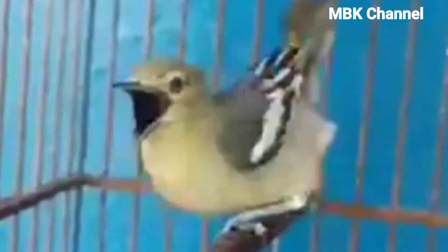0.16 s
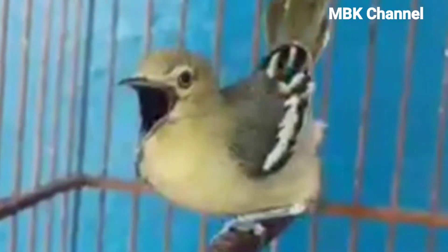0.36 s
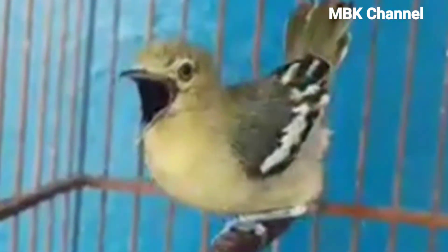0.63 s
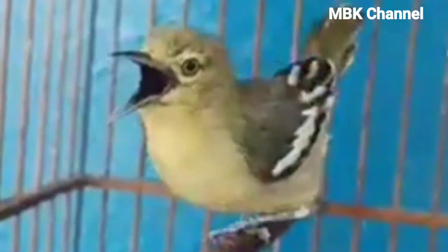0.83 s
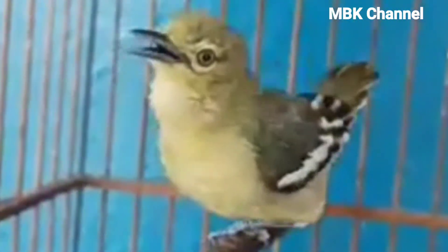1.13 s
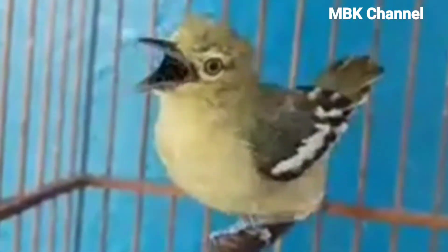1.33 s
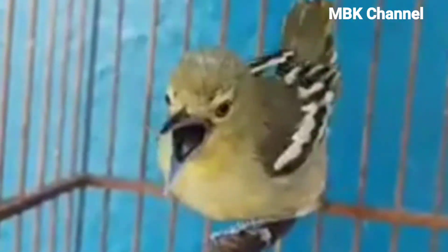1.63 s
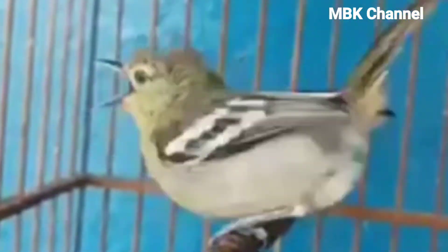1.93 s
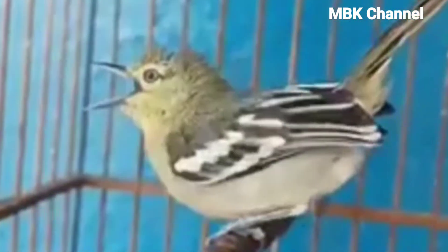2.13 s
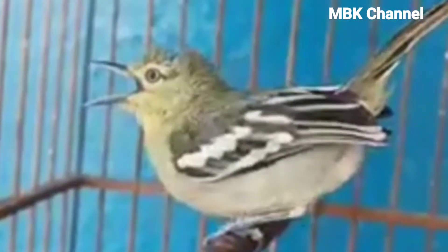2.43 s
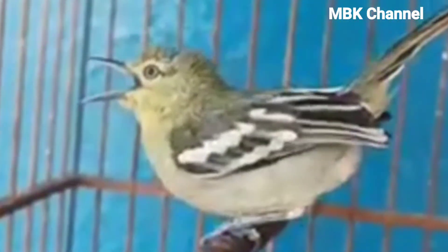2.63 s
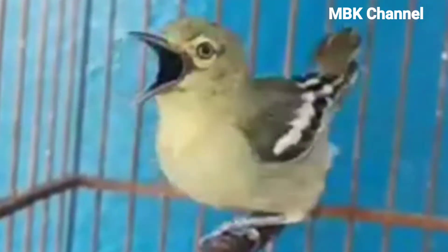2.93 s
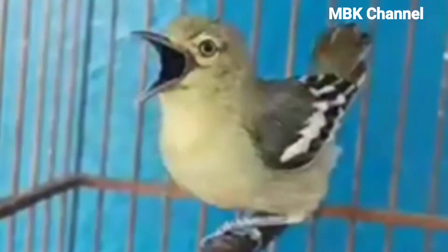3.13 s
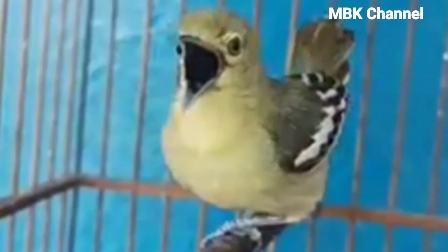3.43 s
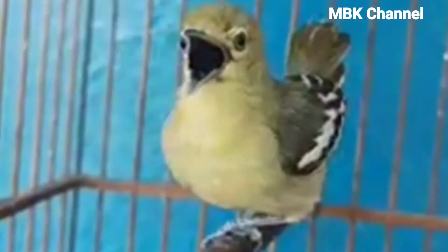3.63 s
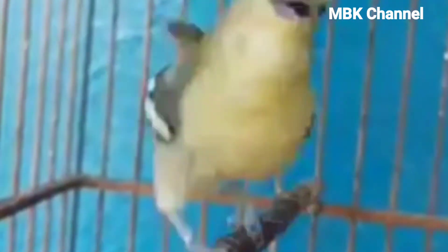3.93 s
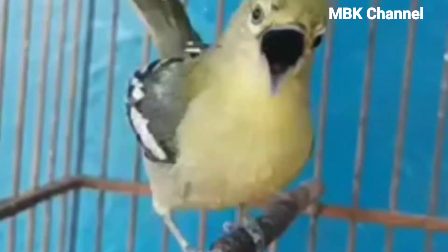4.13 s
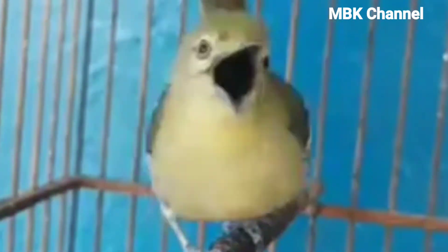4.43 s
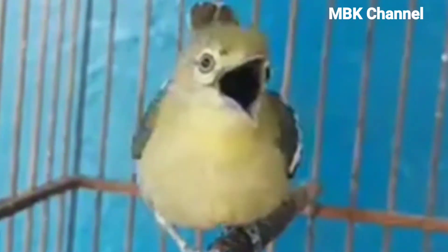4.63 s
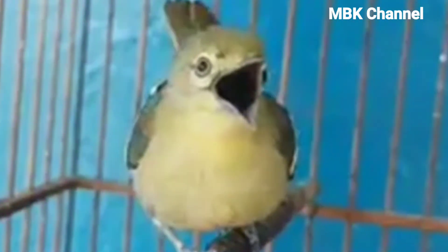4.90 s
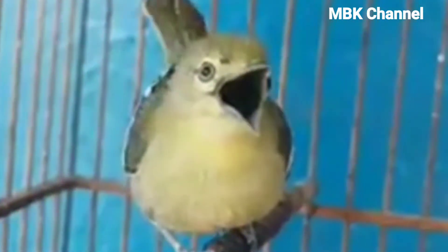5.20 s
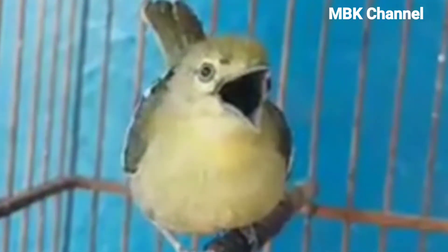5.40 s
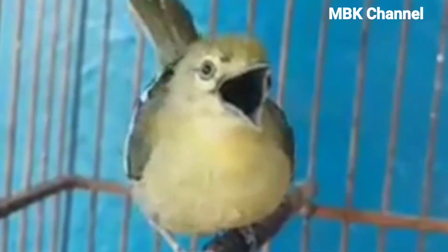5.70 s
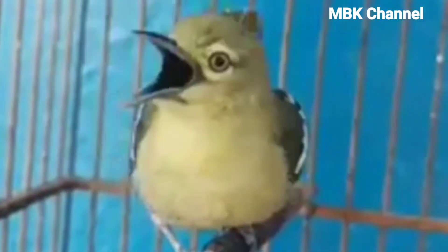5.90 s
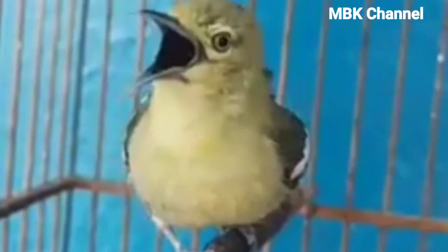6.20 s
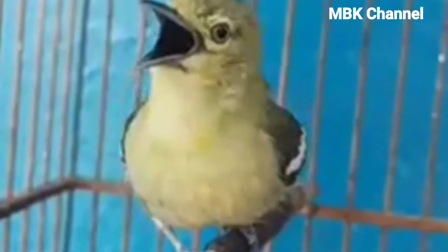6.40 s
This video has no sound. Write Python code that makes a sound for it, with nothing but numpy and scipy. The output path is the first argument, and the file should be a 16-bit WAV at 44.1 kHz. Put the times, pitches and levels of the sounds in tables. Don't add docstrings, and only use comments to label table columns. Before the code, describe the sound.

Brief scratchy scuffs on a perch, then a harsh throbbing bird rasp very near the microphone, followed by a short whistle sliding down. In the gap, thin far birdsong echoes from walls above traffic rumble and faint engine hum. The rasp and fall repeat. After a quieter stretch of distant chips, rapid pips swell into a clear held whistle that lasts to the end. Background dips under loud calls.

```python
import sys
import numpy as np
from scipy import signal
from scipy.fft import rfft, irfft, next_fast_len
from scipy.io import wavfile
from scipy.ndimage import uniform_filter1d

SR = 44100
rng = np.random.default_rng(int(sys.argv[2]) if len(sys.argv) > 2 else 0)


def store_wav(level_fs):
    pcm = np.round(np.clip(np.atleast_2d(level_fs), -1, 1) * 32767)
    wavfile.write(sys.argv[1], SR, pcm.T.astype(np.int16))


def elevation(decibels):
    levels = np.asarray(decibels, float)
    return 10 ** (levels / 20)


N = 288855


def evened(x):
    return x / np.sqrt(np.mean(x ** 2) + 1e-20)


def wander(n, size):
    noise = rng.standard_normal(SR * 2)
    return evened(uniform_filter1d(uniform_filter1d(noise, size), size))[:n]


def read(points, hz):
    f, value = np.transpose(points)
    return np.interp(np.log(hz + 1), np.log(f + 1), value)


def stretched(shape, start, length):
    share, *columns = np.transpose(shape)
    return [start + length * share] + columns


def unroll(rows):
    s, *columns = np.transpose(rows)
    t = np.arange(s[0], s[-1], 1 / SR)
    return s[0], [np.interp(t, s, c) for c in columns]


def add(mix, s, sound):
    part = mix[round(s * SR):][:len(sound)]
    part += sound[:len(part)]


def soft_ends(n, seconds):
    k = np.arange(n)
    return np.sin(np.pi / 2 * np.clip(np.minimum(k, n - k) / (seconds * SR), 0, 1)) ** 2


def resonate(x, hz, width):
    turn = np.exp(2j * np.pi * np.cumsum(hz * np.ones(len(x))) / SR)
    r = np.exp(-np.pi * width / SR)
    return 2 * (turn * signal.lfilter([1 - r], [1, -r], x / turn + 1e-18)).real


def resonate_twice(x, hz, width, hz_2, width_2):
    return resonate(resonate(x, hz, width), hz_2, width_2)


def shaped(x, gain):
    n = next_fast_len(N + 4096)
    return irfft(rfft(x, n) * gain(np.fft.rfftfreq(n, 1 / SR)), n)[..., :N]


def ports(x, lead_ms, left_db):
    left = shaped(x, lambda hz: elevation(left_db / 2) * np.exp(2j * np.pi * hz * lead_ms / 1000))
    return np.array([left, x * elevation(-left_db / 2)])


# (f/Hz, time to fall 60 dB/s)
YARD_RING = [(300, 0.29), (1500, 0.23), (4000, 0.29), (8000, 0.31)]


def yard(x, predelay_s):
    taps = np.zeros((2, SR))
    at = np.arange(round(predelay_s * SR), SR - 40, 20)
    at = at + rng.integers(0, 20, (2, SR // 20))[:, :len(at)]
    signs = rng.choice([-1., 1.], (2, SR // 20))[:, :at.shape[1]]
    np.put_along_axis(taps, at, signs, 1)
    hz, t, z = signal.stft(taps, SR, nperseg=256)
    decay_db = -60 * t / read(YARD_RING, hz)[:, None]
    tail = signal.istft(z * elevation(decay_db), SR, nperseg=256)[1]
    return signal.fftconvolve(x[None], tail / np.linalg.norm(tail[0]), axes=1)[:, :N]


# (f/Hz, level per Hz/dB)
YARD_AIR = [(15, -72), (30, -31.5), (76, -17), (123, -2.5), (209, -17.5), (282, -22), (324, -18),
            (408, -21.5), (796, -28.5), (1030, -27.5), (1350, -30), (1960, -30.5), (2830, -31),
            (3250, -35.5), (6200, -48.5), (8060, -48.5), (13600, -120)]
# (t/s, level/dB)
TRAFFIC_SWELL = [(0, -48), (1.199, -51), (1.499, -46.5), (2.9, -47.5), (3.9, -47), (4.149, -48), (5.1, -46),
                 (5.9, -45), (6.55, -40)]
# (f/Hz, likeness 0-1)
LIKENESS = [(60, 0.97), (150, 1), (370, 0.81), (930, 0.3), (2310, 0.017), (5750, 0.072)]


def traffic():
    frames, hz = N // 512 + 5, np.fft.rfftfreq(2048, 1 / SR)
    a, b, c, d, patches = rng.standard_normal((frames, 1025, 5)).T
    patches = evened(uniform_filter1d(uniform_filter1d(patches, 8, 0), 8, 1))
    same = np.clip(read(LIKENESS, hz), -1, 1)[:, None]
    left = a + 1j * b
    right = same * left + np.sqrt(1 - same ** 2) * (c + 1j * d)
    z = np.array([left, right]) * elevation(read(YARD_AIR, hz)[:, None] + 2.54 * patches)
    rumble = evened(signal.istft(z, nperseg=2048, noverlap=1536)[1][:, :N])
    swell_db = np.interp(np.arange(N) / SR, *np.transpose(TRAFFIC_SWELL))
    return elevation(swell_db + [[2.5], [1.5]]) * rumble


# (t/s, length/s, level/dB, brightness/dB)
HOPS = [
    (.008, 0.03, -54.5, -25),
    (0.104, 0.011, -50, -3),
    (0.12, 0.0044, -79, -19.5),
    (2.028, 0.017, -57, -3.5),
    (4.507, 0.056, -72.5, 6),
]


def hops():
    out = np.zeros(N)
    for s, length, db, bright_db in HOPS:
        grit = rng.standard_normal(4000) * elevation(0.45 * rng.exponential(1, 4000))
        grit = grit[:round(length * SR)]
        dull, bright = evened(resonate(grit, 1600, 3930)), evened(np.diff(grit, prepend=0))
        add(out, s, elevation(db) * (dull + elevation(bright_db) * bright) * soft_ends(len(grit), 0.0014))
    return ports(out, 0.09, 21.5) + elevation(5.0) * yard(out, 0.0053)


# (t/s, length/s, effort level/dB, throat pitch f/Hz)
RASPS = [
    (0.166, 0.9136, -24.5, 4503),
    (2.918, 0.92, -25, 4442),
]
# (share of length, effort level/dB, share of throat pitch, beak brightness/dB, low rattle/dB)
RASP_SHAPE = [(0, -14, 1.03, 9.5, 12.5), (.025, -3.5, 0.89, 17, 9), (.25, -1, 0.96, 6, 4.5),
              (.5, 1.9, 0.9, 4.5, 0), (.72, 4.5, 0.88, -12, -2), (.86, 5, 0.84, -5.5, -5.5),
              (.95, 5, 0.7, 0, -6), (.985, -6.5, 0.49, -18, 1.5), (1, -18, 0.32, -34.5, -1.5)]
# (share of throat pitch, width f/Hz, level/dB)
THROAT = [(.25, 350, -19), (.34, 512, -15), (.56, 435, -5), (.7, 415, -4), (.84, 447, 5), (1.01, 373, 10.5),
          (1.22, 517, -11), (1.6, 1020, -28)]
# (f/Hz, width
# f/Hz, depth 0-1, change of depth by the end)
RASP_DIPS = [(1830, 220, .5, .5), (5850, 200, .85, 0), (5900, 250, .7, 0), (3720, 300, 1.1, -.8),
             (3740, 300, 1, -.9), (2740, 220, .5, 0)]


def rasp(start, length, level_db, top_hz):
    curves = np.transpose(stretched(RASP_SHAPE, start, length))
    s, (effort_db, closing, bright_db, low_db) = unroll(curves)
    n, hz = len(closing), top_hz * closing
    depth = np.linspace(0.45, 0.72, n)
    throbs_per_s = 65 * (1 + 0.086 * wander(n, size=300))
    beat = (.5 + .5 * np.cos(2 * np.pi * np.cumsum(throbs_per_s) / SR)) ** 2.5
    white, chance = rng.standard_normal(SR * 2)[:n], rng.random(SR * 2)[:n]
    size = rng.exponential(1, SR * 2)[:n]
    snaps = (chance < 900 / SR) * elevation(0.4 * np.minimum(size, 3))
    drive = evened(snaps - snaps.mean()) + 1.12 * white
    throat = np.zeros(n)
    for k, (share, width, db) in enumerate(THROAT):
        low, high = share < .6, share > 1.1
        deep = np.clip(depth + .3 * low, .25, .92)
        throbbing = drive * (1 - deep + deep * beat ** (1 + low))
        ring = resonate_twice(throbbing, share * hz, width * 1.82, share * hz, width * 1.7)
        ring_db = db + bright_db * high + low_db * low
        throat += (-1) ** k * elevation(ring_db) * ring
    for dip_hz, width, most, change in RASP_DIPS:
        dip_depth = np.clip(most + change * np.arange(n) / n + .2 * wander(n, size=5000), 0, 1)
        moving_hz = dip_hz * (1 + .008 * wander(n, size=6000))
        throat = throat - dip_depth * resonate(throat, moving_hz, width)
    return s, elevation(level_db + effort_db) * evened(throat) * soft_ends(n, 0.0068)


def whistle(rows, tones=(), waver=0.006, fade=0.0022, flutter_db=0., blur=0.):
    s, (hz, db, octave_db) = unroll(rows)
    n = len(hz)
    turn = 2 * np.pi * np.cumsum(hz * (1 + waver * wander(n, size=150))) / SR
    upper = 0
    for k, g in enumerate(tones):
        strength = .9 / (k + 1) ** 1.5 + .45 * wander(n, size=300)
        upper = upper + elevation(g) * strength * np.sin((k + 3) * turn + .3 * k * wander(n, size=80))
    tone = elevation(db + flutter_db * wander(n, size=200)) * np.sin(turn)
    octave_blur = blur * np.linspace(0, 1, n) * wander(n, size=50)
    tone = tone + elevation(octave_db) * np.sin(2 * turn + octave_blur)
    tone = tone + elevation(np.linspace(-4, -20, n)) * upper * soft_ends(n, 0.028)
    return s, np.sqrt(2) * tone * soft_ends(n, fade)


FALL_TONES = [-44.5, -35.5, -34, -53, -41, -51]
# (share of length, level/dB)
WHEEZE = [(0, -3.5), (.5, -15), (.68, -0.5), (.95, -4), (1, -11)]


def falling_whistle(shape, start, length, level_db):
    out = np.zeros(N)
    s, share, db, octave_db = stretched(shape, start, length)
    rows = np.transpose([s, 2230 * share, level_db + db, octave_db])
    add(out, *whistle(rows, FALL_TONES, waver=.002, fade=.003, blur=1.6))
    catch = evened(resonate_twice(rng.standard_normal(400), 2180, 1100, 2230, 690))
    add(out, start - .002, elevation(-33.5) * catch * soft_ends(400, 0.0034))
    s, (leak_db,) = unroll(np.transpose(stretched(WHEEZE, start, length)))
    air = rng.standard_normal(SR)[:len(leak_db)]
    air = evened(resonate_twice(air, 2490, 1600, 2490, 1600)) + elevation(-6.5) * air
    add(out, s, elevation(-44.5 + leak_db) * air * soft_ends(len(air), .003))
    return out


# (start t/s, end t/s, f/Hz, level/dB)
DRONES = [
    (4.1, 4.48, 261, -57),
    (4.62, 5.25, 210, -56),
    (5.92, 6.6, 215, -54),
    (1.4, 2.75, 1060, -63),
    (4.15, 6.6, 121, -51),
    (4.5, 6.3, 312, -62),
    (5.0, 5.6, 525, -64),
    (4.7, 5.6, 172, -58),
    (1.4, 3.0, 118, -54),
]


def drones():
    out = np.zeros(N)
    for t0, t1, hz, db in DRONES:
        noise = rng.standard_normal(SR * 2)[:round((t1 - t0) * SR)]
        hum = evened(resonate_twice(noise, hz, hz ** 2 / 12000, hz, hz / 10))
        add(out, t0, elevation(db) * hum * soft_ends(len(hum), 0.0059))
    return out


# (share of length, share of top pitch, level/dB)
CLIMB = [(0, .5, -6), (.42, .59, 0), (.68, .77, 2), (.84, .88, -5), (1, 1, -10)]
HOOK = [(0, .82, -3), (.19, 1, -2), (.26, .98, -3), (.48, .81, 1), (.55, .77, -11), (.75, .69, -8),
        (1, .76, -12)]
ARCH = [(0, .7, -3), (.3, .95, -1), (.48, 1, 0), (.63, .95, -3), (.78, .77, 0), (1, .63, -2)]
SPIKE = [(0, .63, -2), (.34, .73, 1), (.47, 1, -4), (.62, .8, -3), (.76, .71, 1), (1, .62, -4)]
CHIP = [(0, .6, -9), (.2, .93, -1), (.3, .98, 2), (.7, 1, -2), (1, .88, -15)]
FLAT = [(0, .95, -8), (.25, 1, 0), (.7, .99, -2), (1, .97, -9)]
SLIDE = [(0, .97, -3), (.2, 1, 0), (.6, .88, 0), (1, .74, -2)]
# (start t/s, end t/s, level/dB, top pitch f/Hz)
FAR_SONGS = [
    (CLIMB, [(1.44, 1.58, -49.5, 5040), (1.985, 2.115, -49.5, 5130), (2.575, 2.685, -43, 5120)]),
    (HOOK, [(1.655, 1.765, -44, 6270), (1.785, 1.9, -50, 6220), (2.228, 2.35, -43, 6475), (2.77, 2.89, -42.5, 6500)]),
    (ARCH, [(1.66, 1.825, -42, 4534), (2.095, 2.14, -59, 4700)]),
    (SLIDE, [(1.84, 1.925, -45.5, 4240), (1.84, 1.91, -46.5, 3860)]),
    (SPIKE, [(1.922, 1.995, -50.5, 3990), (2.455, 2.543, -46.5, 4200), (5.12, 5.19, -73, 6800)]),
    (CHIP, [(5.188, 5.27, -46.5, 4320), (5.435, 5.52, -46.5, 4233), (5.668, 5.75, -47, 4240), (5.868, 5.95, -48, 4150)]),
    (FLAT, [(4.105, 4.186, -46, 4250), (6.32, 6.47, -50, 4620), (6.29, 7.4, -54, 4280)]),
]


def far_birds():
    birds = np.zeros(N)
    for song, calls in FAR_SONGS:
        for start, end, level_db, top_hz in calls:
            s, share, db = stretched(song, start, end - start)
            rows = np.transpose([s, top_hz * share, level_db + db, level_db + db - 21])
            add(birds, *whistle(rows, waver=.004, fade=.003, flutter_db=5))
    return ports(birds, 0.079, 0) + elevation(-0.5) * yard(birds, 0.0052)


# (t/s, length/s, level/dB, pitch f/Hz)
PIPS = [
    (6.0106, 0.023, -27.5, 3336),
    (6.08, 0.021, -22.5, 3235),
    (6.1353, 0.022, -20, 3240),
    (6.186, 0.023, -18, 3163),
]
# (share of length, share of pitch, level/dB, octave level/dB)
PIP_SHAPE = [(0, 1.15, 0, -47.5), (.12, 1.07, -4, -53), (.28, 1.03, -9, -42), (.42, 1.0, -2.5, -32),
             (.58, 0.991, -0.5, -33.5), (.72, 1.01, -3, -35.5), (.86, 1.038, -9.5, -50),
             (1, 1.2, -21.5, -54)]


def pips():
    out = np.zeros(N)
    for start, length, level_db, hz in PIPS:
        s, share, db, octave_db = stretched(PIP_SHAPE, start, length)
        rows = np.transpose([s, hz * share, level_db + db, level_db + octave_db])
        add(out, *whistle(rows, waver=.002, fade=.0015))
        spit = evened(resonate_twice(rng.standard_normal(2000), 4660, 800, 3800, 800))
        spit = spit[:round(length * SR)]
        add(out, start, elevation(-49) * spit * soft_ends(len(spit), 0.004))
    return out


# (t/s, length/s, level/dB, top pitch f/Hz)
COOS = [
    (6.073, 0.11, -38.5, 923),
    (6.437, 0.07, -44, 882),
]
# (share of length, share of top pitch, level/dB)
COO_SHAPE = [(0, .92, -9), (0.299, 1, -1), (.72, 1, -6), (1, 0.81, -21.5)]


def dove():
    coos = np.zeros(N)
    for start, length, level_db, top_hz in COOS:
        s, share, db = stretched(COO_SHAPE, start, length)
        rows = np.transpose([s, top_hz * share, level_db + db, np.full(len(s), -99)])
        add(coos, *whistle(rows, waver=0.014, fade=0.012))
    return coos + elevation(-0.5) * yard(coos, 0.0096)


# (t/s, pitch f/Hz, level/dB)
HELD = [(6.2315, 3480, -27), (6.236, 3260, -19), (6.25, 3190, -18.8), (6.259, 3260, -23.5),
        (6.274, 3260, -24), (6.283, 3200, -17.6), (6.36, 3145, -16.8), (6.45, 3100, -16.3),
        (6.56, 3078, -14.6)]


def held_whistle():
    out = np.zeros(N)
    rows = [(s, hz, db, db - 41 - 48.5 * (s - HELD[0][0])) for s, hz, db in HELD]
    add(out, *whistle(rows, waver=.0006, fade=.0015))
    return out


# (start t/s, end t/s, level/dB, left port lead/ms, left over right/dB)
FALLS = [
    (1.165, 1.408, -5.5, 0.18, 4),
    (3.94, 4.201, -7, 0.206, 4.5),
]
# (share of length, share of pitch, level/dB, octave level/dB)
FALL_SHAPES = [
    [(0, 1, -10, -50), (.055, 0.99, -9.5, -48), (.22, 0.98, 0, -51), (.33, 0.94, -5, -46),
     (.47, .86, -8.5, -56.5), (.56, .75, -12, -45), (.65, .68, -7, -43.5), (.76, .59, -23, -25),
     (1, .46, -40.5, -33)],
    [(0, 1.01, -31, -53), (.07, 0.99, -7, -51), (.27, 0.95, -5, -53), (.4, .86, 1, -52),
     (.47, .81, -11.5, -55), (.55, .72, -21, -41), (.61, .685, -5.5, -37.5), (.76, .555, -24, -34.5),
     (1, .45, -35.5, -31.5)],
]
# (t/s, left over right/dB)
HEAD_TURN = [(6.0, 5), (6.24, 10.5), (6.38, 1), (6.55, -0.5)]
# (delay t/s, level/dB, extra delay to the right port/ms)
ECHOES = [(.0021, -11, 0.0), (.0047, -8, 0), (.009, -12, .37), (.014, -12, -.5), (0.023, -20, 1.4)]


def singer():
    rasps, falls = np.zeros((2, N))
    tones, turn = np.zeros((2, N)), []
    for row in RASPS:
        add(rasps, *rasp(*row))
    for (start, end, level_db, lead_ms, left_db), shape in zip(FALLS, FALL_SHAPES):
        one = falling_whistle(shape, start, end - start, level_db)
        falls, tones = falls + one, tones + ports(one, lead_ms, 0)
        turn += [(start, left_db), (end, left_db)]
    front = pips() + held_whistle()
    right = elevation(-np.interp(np.arange(N) / SR, *np.transpose(turn + HEAD_TURN)))
    rasp_lead_ms = .183
    direct = ports(rasps, rasp_lead_ms, left_db=0.97)
    direct = direct + (tones + ports(front, -0.0022, 0)) * [np.ones(N), right]
    off_cage = ports(rasps, rasp_lead_ms, left_db=1.0)
    for s, db, extra_ms in ECHOES:
        add(direct[0], s, elevation(db) * off_cage[0])
        add(direct[1], s + extra_ms / 1000, elevation(db) * off_cage[1])
    to_walls = elevation(-6.5) * rasps + elevation(-14) * falls + elevation(-10.5) * front
    add(to_walls, 0.14, elevation(-34) * falls)
    return direct, yard(to_walls, 0.0065)


def scene():
    near, tail = singer()
    power_db = 10 * np.log10(abs(uniform_filter1d((near ** 2).mean(0), 400)) + 1e-12)
    fall = np.arange(N) * 300.0 / SR
    held_db = np.maximum.accumulate(power_db + fall) - fall
    over_db = np.maximum(held_db + 26.5, 0)
    duck = elevation(-.6 * uniform_filter1d(over_db, 300))
    return near + tail + far_birds() + dove() + hops() + duck * (drones() + traffic())


def masked(x, under_db, slope_db):
    hz, t, z = signal.stft(x, SR, nperseg=1024, noverlap=768)
    bands = 10 * np.log10((abs(z[:, :512]) ** 2).reshape(2, 64, 8, -1).mean(2) + 1e-16)
    slope = slope_db * np.arange(64)[:, None]
    shadow = np.maximum.accumulate(bands + slope, axis=1) - slope - under_db
    shadow = np.minimum(shadow, -74)
    keep = 1 / (1 + np.exp(np.clip(shadow - bands, -30, 30)))
    keep[:, :7] = 1
    z[:, :512] *= np.repeat(keep, 8, axis=1)
    return signal.istft(z, SR, nperseg=1024, noverlap=768)[1][:, :N]


def hollowed(x, valley_db, under_db):
    hz, t, z = signal.stft([x[0] + x[1], x[0] - x[1]], SR, nperseg=1024, noverlap=768)
    power = (abs(z[:, :192]) ** 2).reshape(2, 48, 4, -1).mean(2)
    bands = 10 * np.log10(abs(uniform_filter1d(power, size=14, axis=2)) + 1e-16)
    below = np.max([np.roll(bands, k, axis=1) for k in range(1, 4)], axis=0)
    above = np.max([np.roll(bands, -k, axis=1) for k in range(1, 4)], axis=0)
    shallow_db = valley_db * np.where(np.arange(48) < 33, 1, .4)[:, None]
    keep = np.minimum(below, above) - bands < shallow_db
    keep &= bands[::-1] - bands < under_db
    keep |= bands > -44
    keep[:, :10] = True
    z[:, :192] *= np.repeat(keep, 4, axis=1)
    both, apart = signal.istft(z, SR, nperseg=1024, noverlap=768)[1][:, :N]
    return np.array([both + apart, both - apart]) / 2


# (f/Hz, level/dB)
TOP = [(7750, -41), (8150, -6), (10000, -7), (11500, -4.5), (12200, -2.5), (13500, -7.5), (15300, -7),
       (15700, -73.5)]


def rebuilt_top(low):
    shift = np.exp(2j * np.pi * 7500 * np.arange(N) / SR)
    moved = (signal.hilbert(low, next_fast_len(N))[:, :N] * shift).real
    hz, t, z = signal.stft(moved, SR, nperseg=256, noverlap=192)
    treble = np.sqrt((abs(z[:, 80:90]) ** 2).mean(1, keepdims=True))
    flat = z / (abs(z) + 1e-9) ** 0.66
    flat = flat / abs(flat[:, 50:90]).mean(1, keepdims=True) * treble ** 0.88
    noise = rng.standard_normal(z.shape) + 1j * rng.standard_normal(z.shape)
    noise = noise * uniform_filter1d(abs(flat), 5, 1)
    slow = uniform_filter1d(uniform_filter1d(abs(z) ** 2, size=3, axis=1), size=40, axis=2)
    loud_enough = slow > slow[:, 64:76].max(1, keepdims=True) / elevation(2 * 20)
    filled = loud_enough & (slow > elevation(-170)) | (hz < 11800)[:, None]
    colour = elevation(read(TOP, hz) - 11.5)[:, None]
    top = signal.istft(filled * (flat + 1.1 * noise) * colour, SR, nperseg=256, noverlap=192)[1]
    return top[:, :N] * elevation([[0], [-7]])


def roll_off(x):
    return signal.sosfilt(signal.butter(12, 15500, fs=SR, output="sos"), x)


def record(dry):
    low = shaped(dry, lambda hz: 1 / (1 + (hz / 8300) ** 60))
    kept = hollowed(masked(low, under_db=13, slope_db=3.6), valley_db=5.5, under_db=11)
    return roll_off(kept + rebuilt_top(low))


dry = scene()
out = record(dry)
store_wav(out)
```